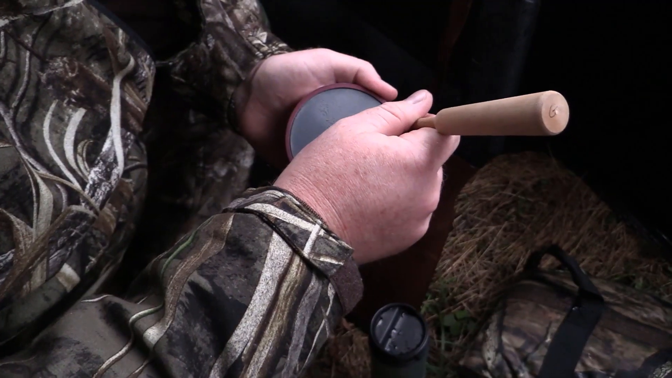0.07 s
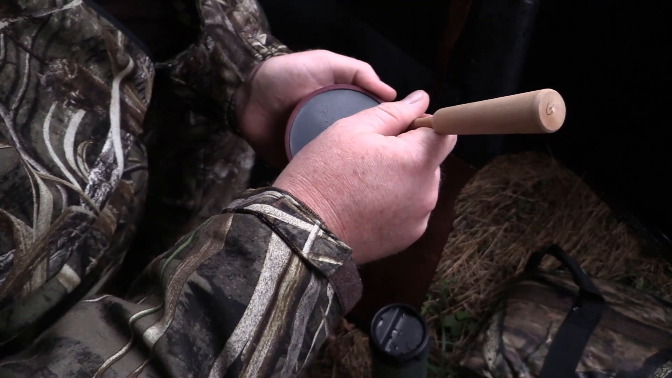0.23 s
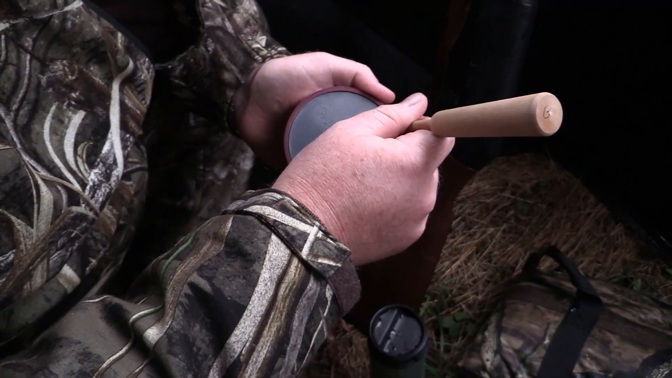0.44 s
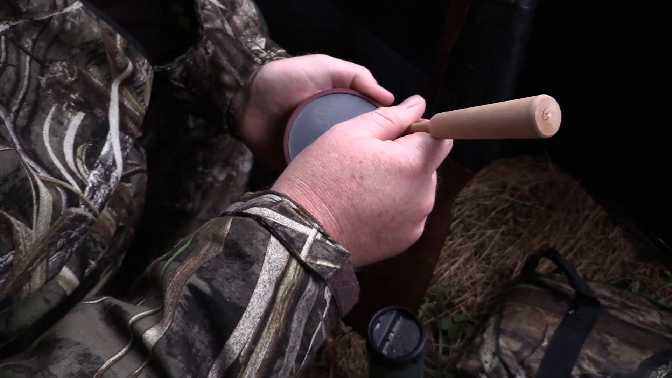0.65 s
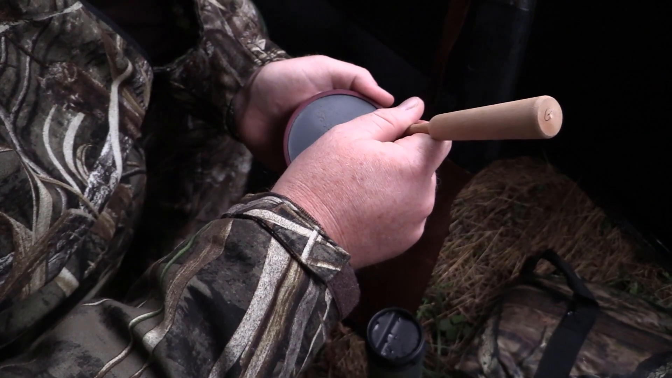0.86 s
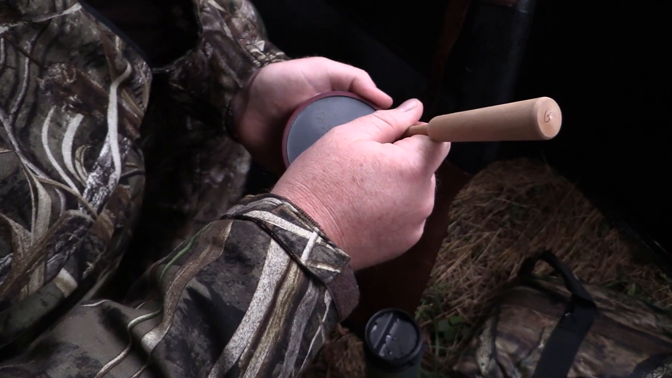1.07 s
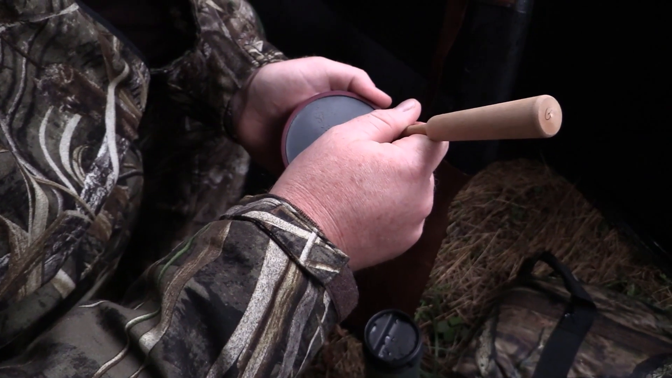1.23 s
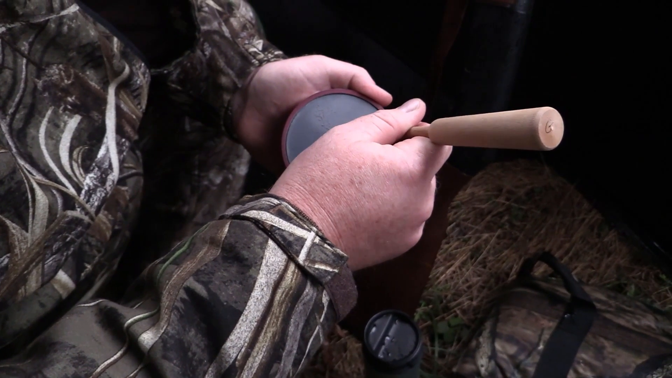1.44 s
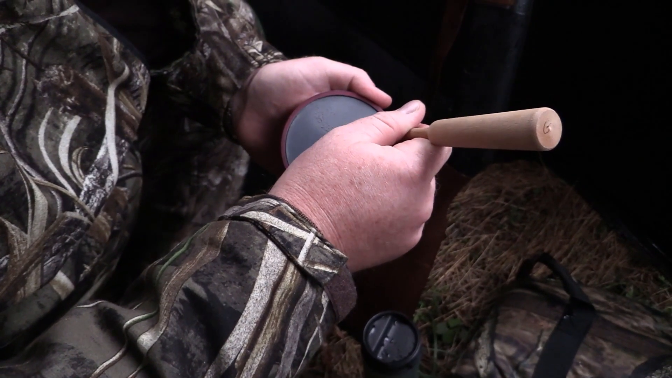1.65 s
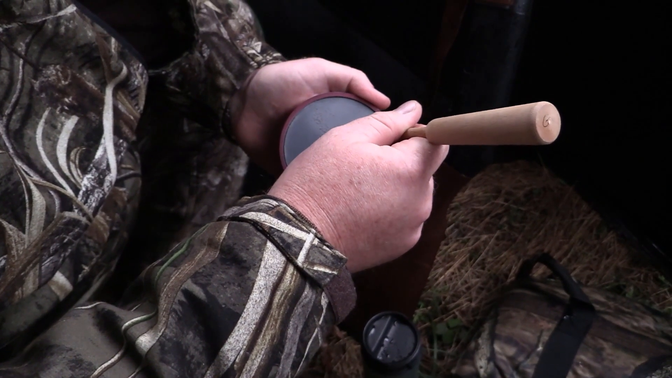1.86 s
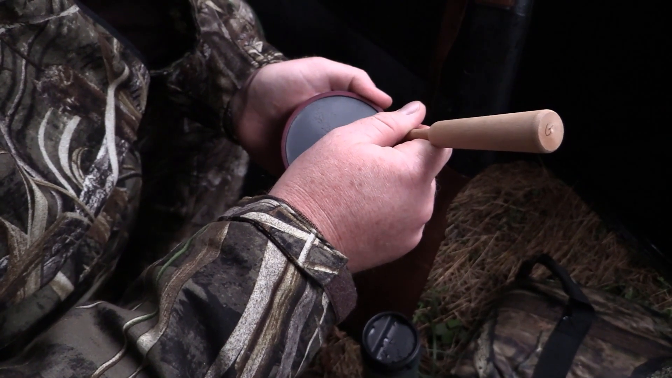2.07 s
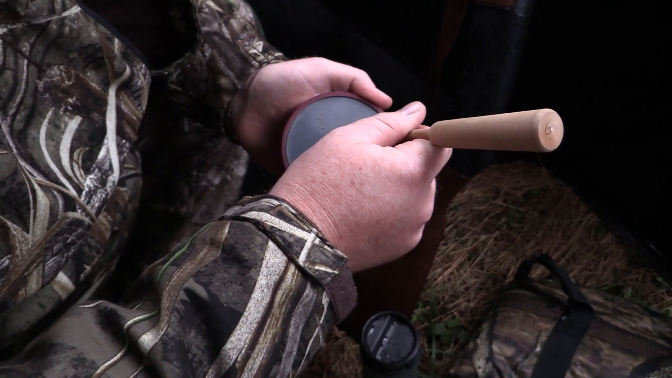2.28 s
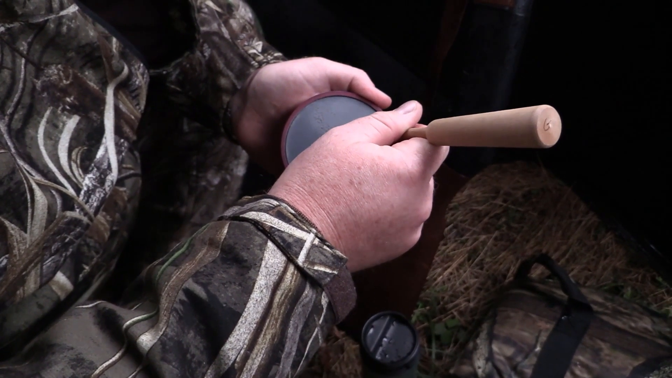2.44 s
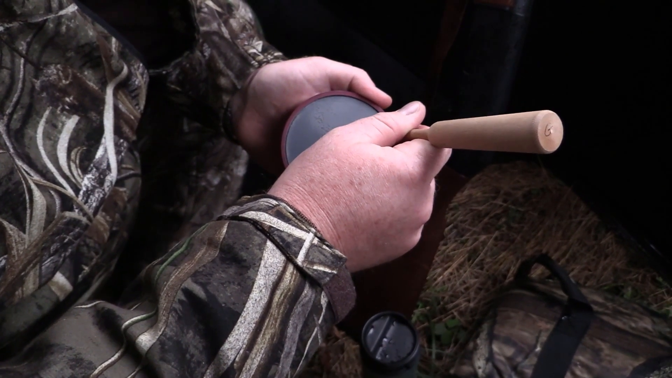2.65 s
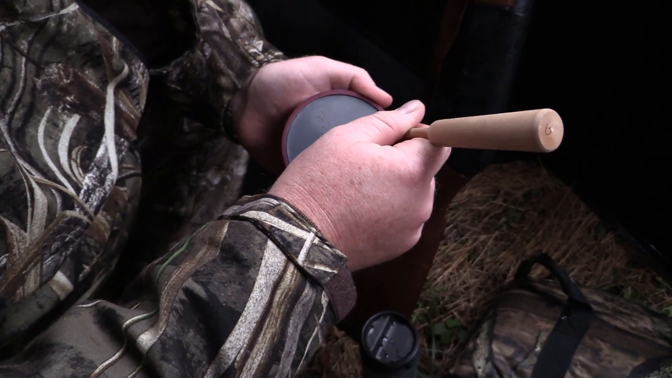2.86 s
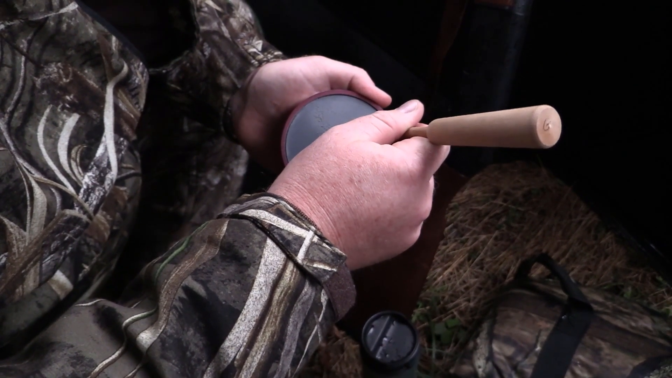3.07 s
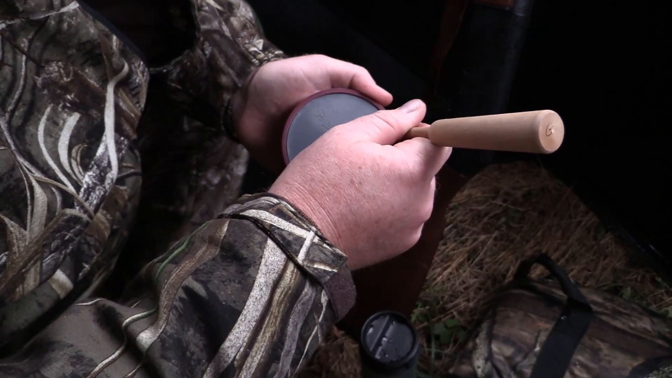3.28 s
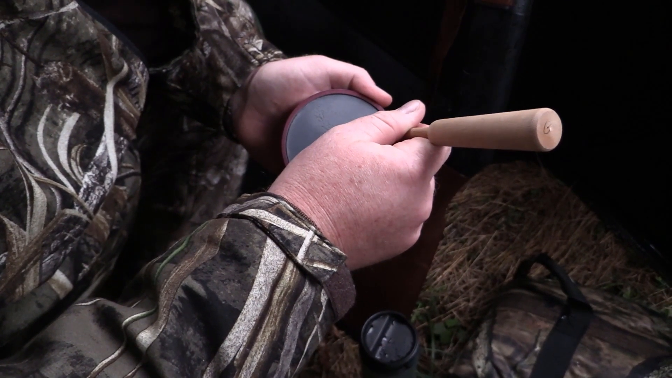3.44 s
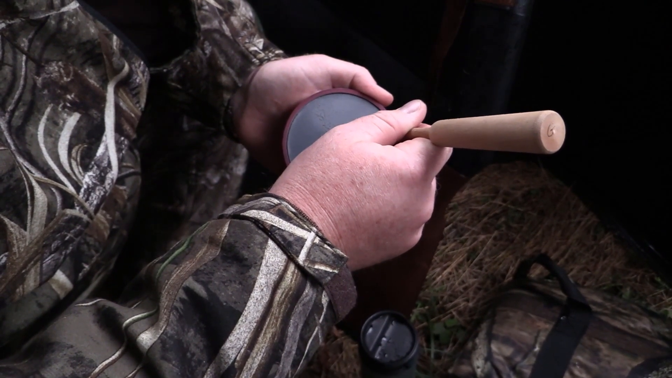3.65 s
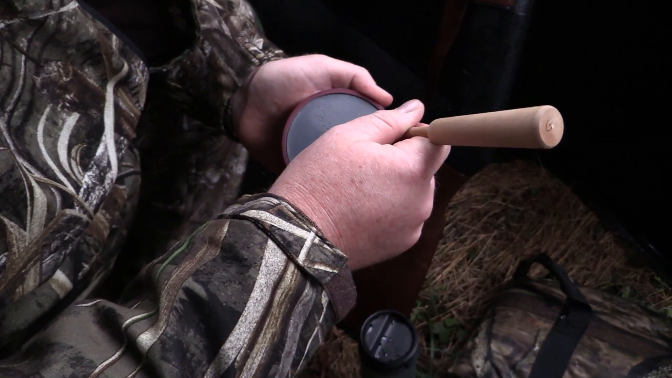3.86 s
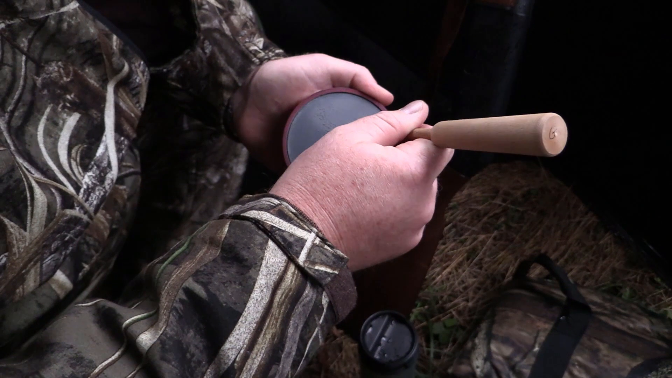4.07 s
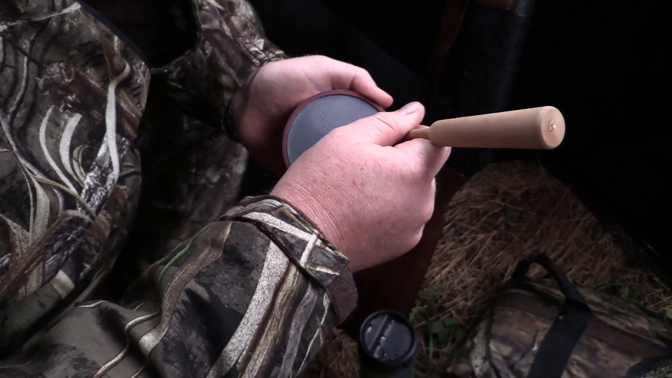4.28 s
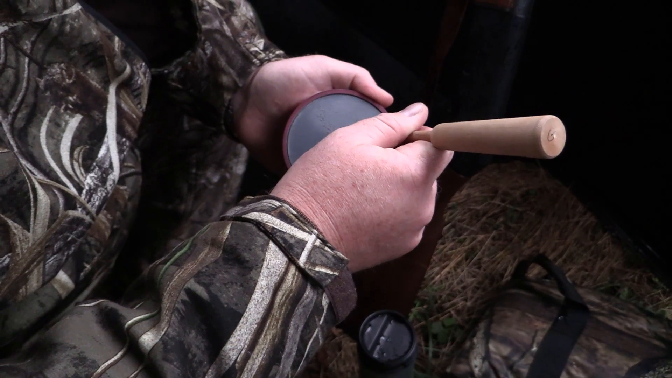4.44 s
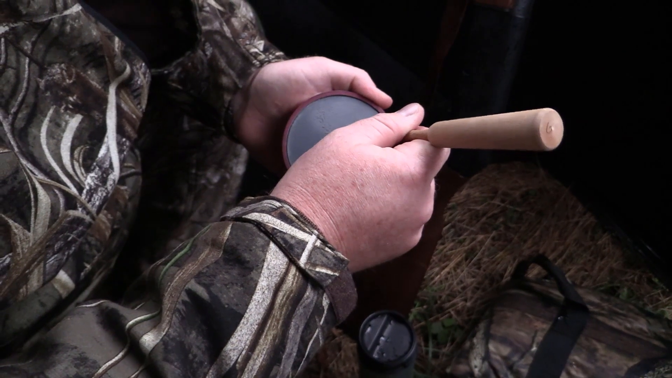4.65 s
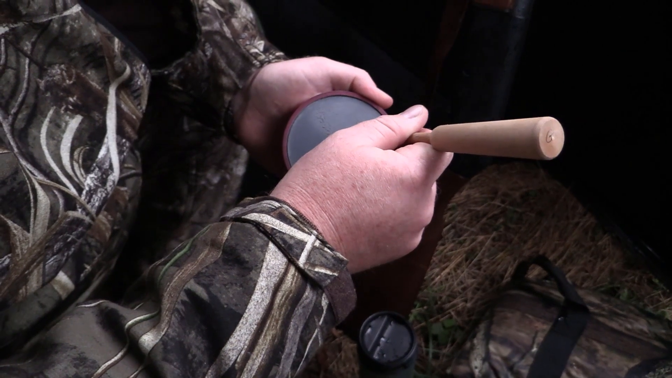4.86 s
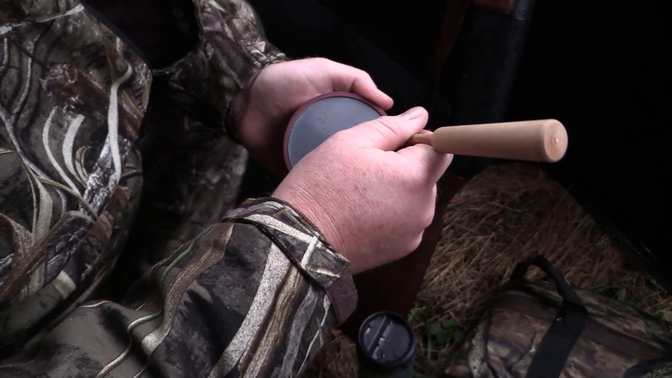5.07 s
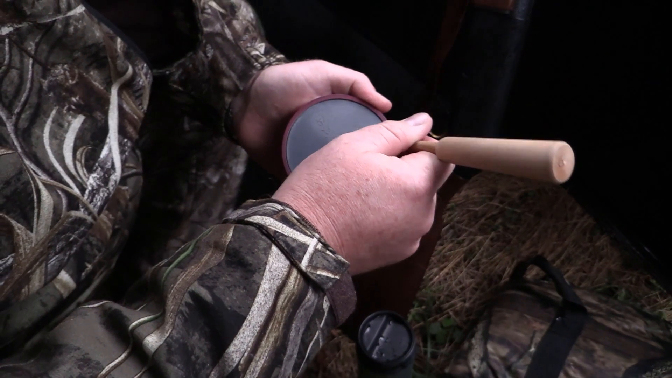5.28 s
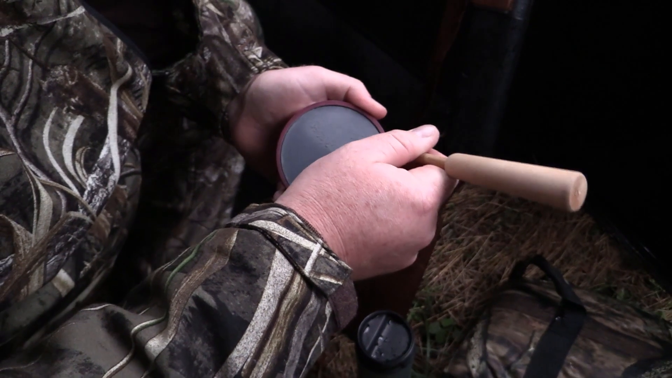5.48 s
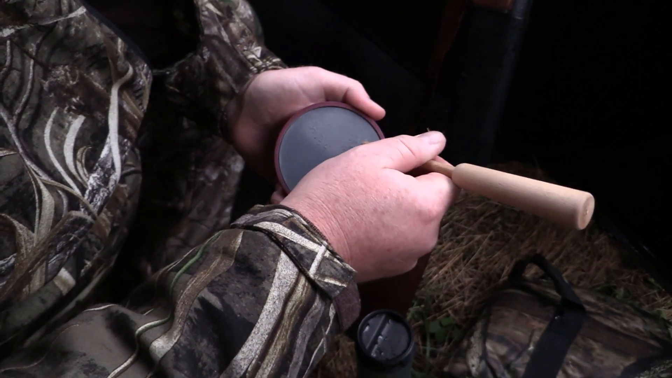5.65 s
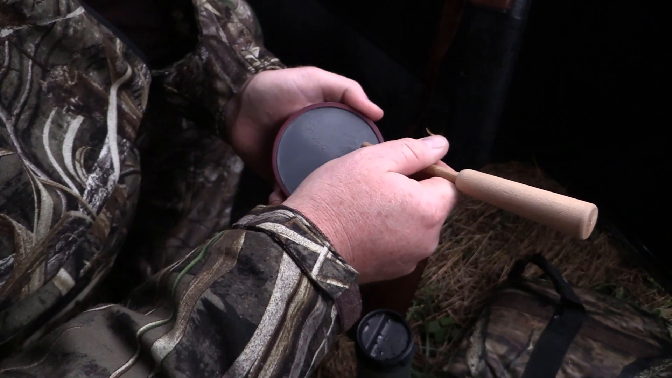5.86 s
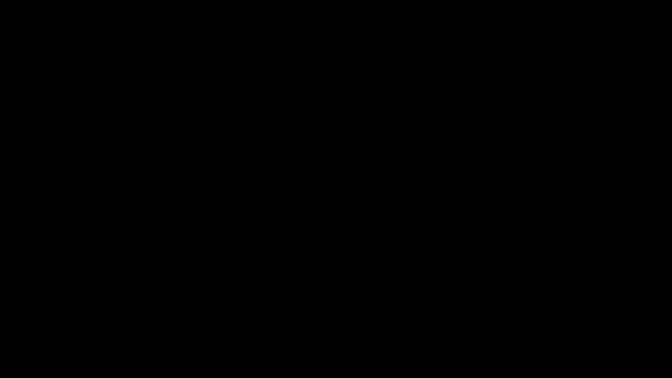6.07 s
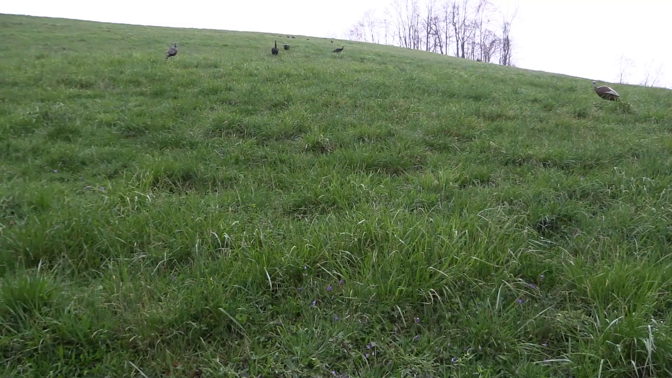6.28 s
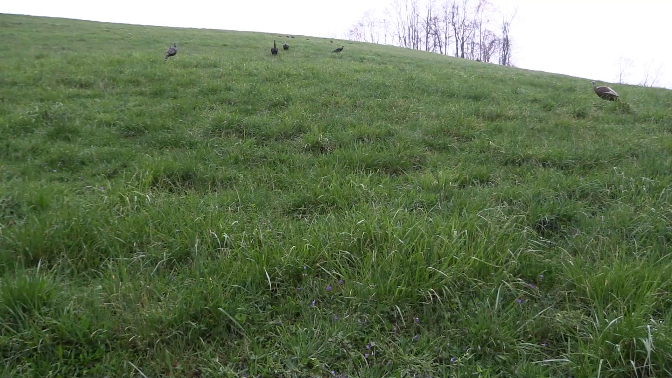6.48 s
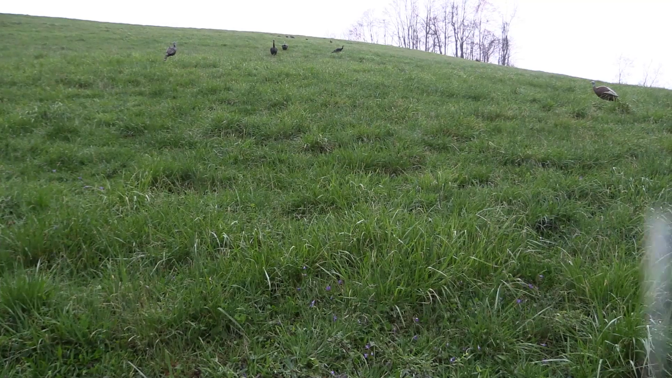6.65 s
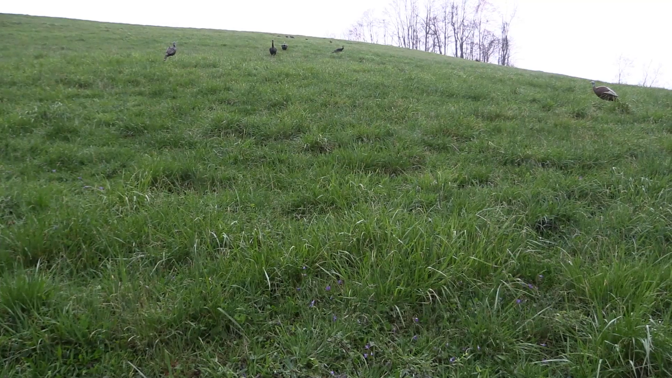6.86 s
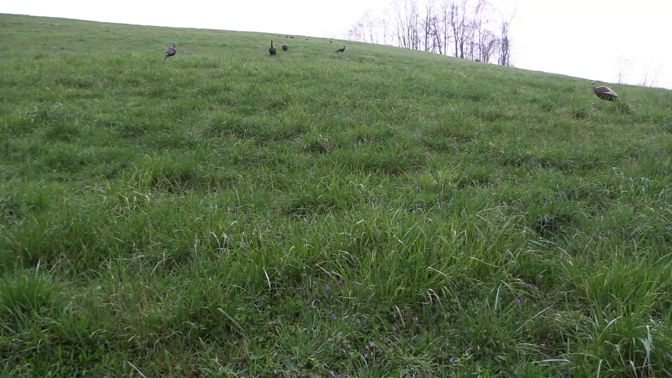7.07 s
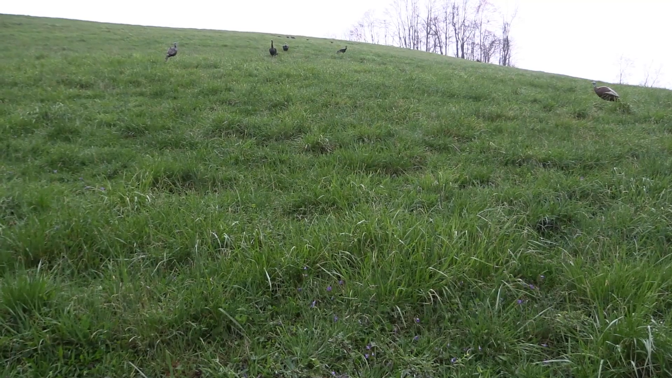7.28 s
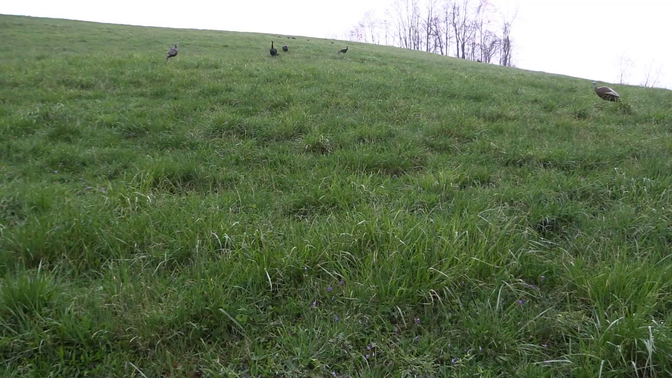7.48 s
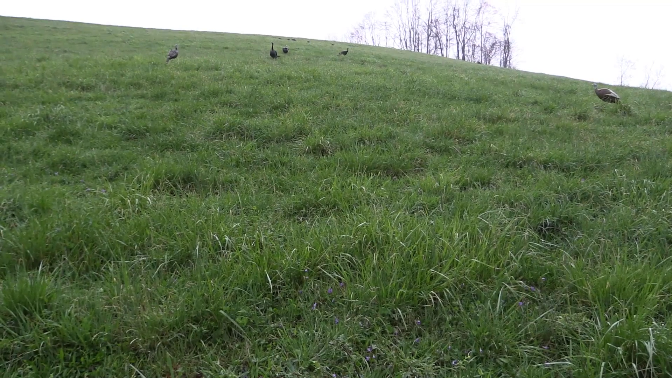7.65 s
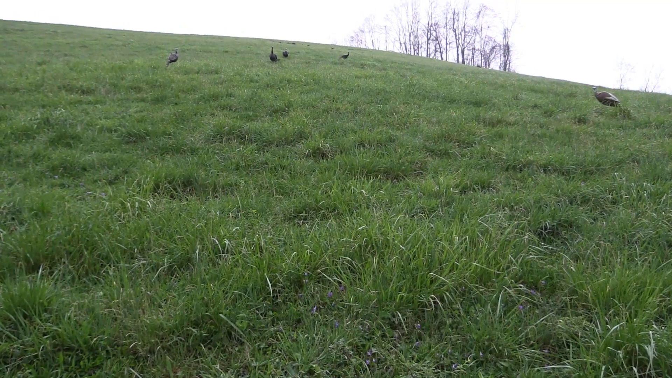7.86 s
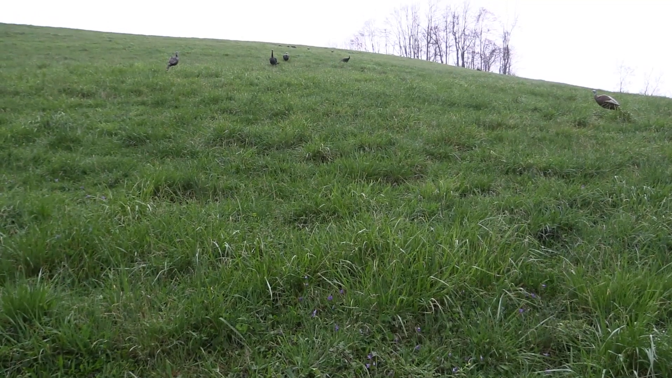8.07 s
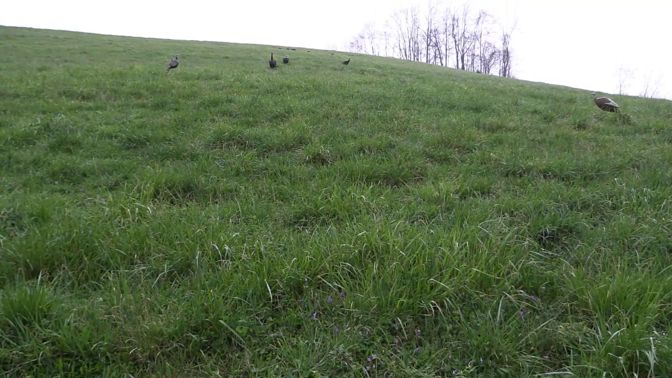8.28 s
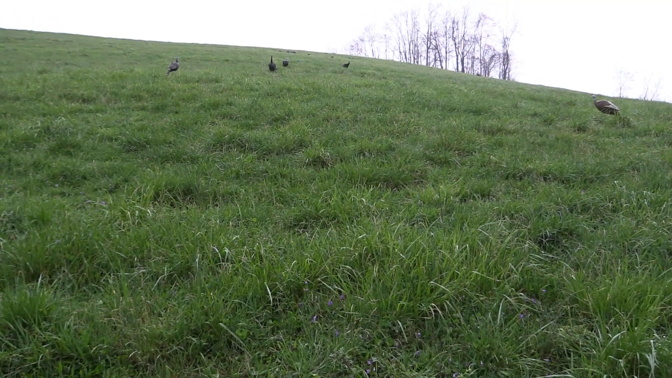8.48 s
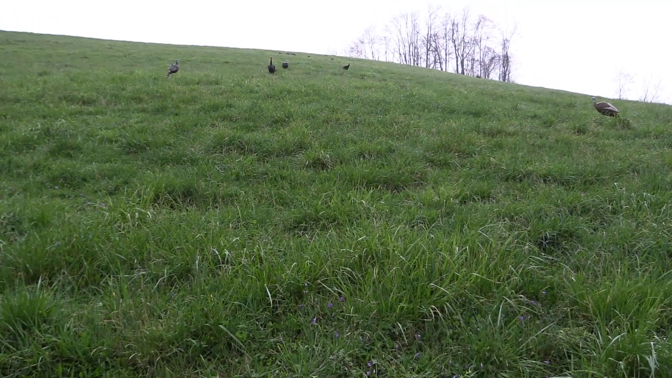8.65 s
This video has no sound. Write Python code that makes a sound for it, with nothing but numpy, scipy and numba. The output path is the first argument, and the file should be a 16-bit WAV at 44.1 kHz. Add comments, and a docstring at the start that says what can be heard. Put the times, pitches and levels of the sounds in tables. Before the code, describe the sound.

Steady rain patters densely on a fabric roof over a soft wash, heard from inside a small dry blind. Very close, a striker on a pot call makes five sharp, hollow clucks at about 0.2, 0.5, 0.8, 1.1 and 1.8 seconds, each a tiny squeaky chirp dipping and rising. From 2.3 to 5.0 come eight yelps, roughly 0.4 seconds apart, each under a tenth of a second, nasal and woody; the first are loud and clear, later ones weaker and raspier. The loud calls duck the rain slightly; faint knocks and dull splashes fall between. Rain alone follows, with small splashes near 5.4 to 5.8. A low handling bump at 6.0 leads into a momentary dropout at 6.1. Then rain sounds more open and darker, with many irregular close drops slapping and thumping cloth, the heaviest near 7.95, continuing to the end at about 8.7 with a faint low rumble swelling.

```python
"""Inside a fabric blind in the rain, the microphone hears a wooden striker drawn over a pot call.
Five short clucks, then eight yelps, come from a tip that sticks and slips and rings the pot.
Rain on the roof is a dense train of filtered impacts over a wash, with a few dull splashes.
After a brief dropout the rain is heard from the open side; single drops slap and thump the cloth close by.
The recorder's limiter holds the calls down and ducks the rain under them."""
import sys
import numpy as np
from scipy import signal
from scipy.fft import rfft, irfft, next_fast_len
from scipy.io import wavfile
from scipy.ndimage import uniform_filter1d, minimum_filter1d, map_coordinates
from numba import njit

SR = 44100
rng = np.random.default_rng(int(sys.argv[2]) if len(sys.argv) > 2 else 0)


def put_to_file(sound):
    """Save the sound as 16-bit audio at rate SR, in the file named by the first command-line argument."""
    columns = np.atleast_2d(sound).T  # one column per channel
    safe = np.clip(columns, -1, 1)
    whole_steps = np.round(safe * 32767)
    wavfile.write(sys.argv[1], SR, whole_steps.astype(np.int16))


N = 384552
TIME = np.arange(N) / SR

# Ringing modes of the pot and striker. Each row: frequency in Hz, 60 dB decay in s, relative level in dB.
POT_MODES = [(1084, 0.062, 3), (1240, .025, -14.5), (1507, 0.088, 2), (1940, 0.052, -0.5),
             (3100, .025, -26.5)]
# How the pot radiates the slips' harmonics. Each row: frequency in Hz, relative level in dB.
POT_COLOUR = [(620, -22.5), (1070, 2.5), (1250, -1.5), (1400, 4), (1510, 10.5), (1680, 1.5), (1850, -5.5),
              (2030, 0.5), (2250, -17.5), (2480, -9), (2750, -21.5), (3100, -9), (3350, -20.5), (4100, -22),
              (4700, -33), (6300, -39), (6740, -35.5), (7400, -45), (15000, -67)]
# Short rings of the pot: first the ringing tail of an earlier cluck, then light knocks of the striker.
# Each row: start in seconds, level in dB.
POT_RINGS = [(0, -18.5), (1.118, -19), (3.0205, -18.5), (3.397, -24), (4.156, -24), (4.868, -18)]
# Clucks, short hard flicks of the striker. Each row: start in seconds, length in s, attack in s,
# base of the slip rate in Hz, level in dB, overtones in dB, rasp from 0 to 1.
CLUCKS = [(0.156, 0.041, 0.0092, 659, 4.5, 3.5, 0), (0.459, 0.034, .012, 708, 1, -0.5, 0.4),
          (0.753, 0.043, 0.0078, 655, 4.5, 3, 0.3), (1.121, 0.048, 0.007, 669, 3, 3, 0.13),
          (1.798, 0.049, .007, 646, 3.5, 2.5, 0.16)]
# Yelps, longer pulls. Each row: start in seconds, length in s, attack in s, base of the slip rate in Hz,
# final rate in Hz, share of the stroke before the turn, drop in a skid in Hz (none if negative),
# level in dB, overtones in dB, rasp from 0 to 1.
YELPS = [(2.301, 0.078, 0.0057, 610.5, 745, 0.55, -7, 2.5, 2.5, 0.32),
         (2.704, 0.077, .003, 612, 748, 0.37, -6, 5, 0.5, 0.23),
         (3.062, 0.088, 0.0092, 624, 705, 0.71, 6.5, -3.5, -1, 0.32),
         (3.451, 0.082, 0.0076, 606, 675, 0.68, 2.5, -3.5, -2.5, .45),
         (3.82, .072, 0.0056, 624, 638, 0.42, 36.5, -11.5, -9.5, 0.63),
         (4.184, 0.089, 0.024, 636, 717, 0.33, -2, 1, -5, 0.27),
         (4.551, 0.089, 0.015, 624, 624, 0.57, 51.5, -4.5, -3.5, 0.41),
         (4.899, 0.097, 0.0068, 617, 660, .59, 84.5, -4, -2.5, 0.45)]
# Heavy drops on the cloth close by. Each row: start in seconds, slap in dB, nominal slap pitch in Hz,
# tick in dB, thump in dB; the levels are rms over 10 ms.
NEAR_DROPS = [(6.197, -25, 970, -37, -18), (6.228, -24, 530, -60, -16.5), (6.2382, -31, 3600, -38, -30),
              (6.29, -17, 3250, -44, -21), (6.3366, -15, 1270, -39, -19), (6.3756, -13, 714, -35, -20),
              (6.405, -22.5, 2510, -50, -35), (6.4747, -17.5, 1150, -42, -13.5),
              (6.5135, -24, 1700, -51, -19.5), (6.563, -17.5, 990, -32, -14.5),
              (6.6463, -17.5, 1620, -36.5, -23), (6.7961, -19.5, 1370, -54, -47),
              (6.859, -22, 606, -62, -14.5), (6.8978, -13.5, 1017, -26, -30), (7.057, -26, 2680, -55, -40),
              (7.073, -17, 900, -56, -12), (7.0976, -23.5, 2050, -48, -35), (7.1125, -28, 1060, -39, -20.5),
              (7.195, -16, 1170, -35, -35), (7.2313, -17, 1240, -26, -13.5), (7.304, -21, 900, -34, -22),
              (7.349, -21, 1130, -38, -21), (7.3777, -16, 1300, -32, -13.5), (7.5268, -17, 760, -38, -30),
              (7.5496, -16.5, 920, -41, -17.5), (7.6128, -15.5, 1270, -35, -20.5),
              (7.7109, -24.5, 1150, -36, -19), (7.745, -22, 960, -39, -19),
              (7.8345, -19.5, 820, -35, -16.5), (7.8899, -22, 1900, -43, -22),
              (7.9451, -10, 1100, -16.5, -4), (8.187, -18.5, 550, -26.5, -14.5),
              (8.3231, -22, 2010, -34.5, -22), (8.414, -18, 1270, -42, -12), (8.5727, -18.5, 470, -40, -16),
              (8.539, -21, 1580, -33.5, -16.5), (8.6578, -23.5, 970, -35, -42)]
# Gathered water splashing on the roof. Each row: start in seconds, length of the spatter in s,
# first drop in dB, spatter in dB.
SPLASHES = [(0.243, .015, -28, -27), (0.339, 0.014, -21, -25), (1.0294, 0.011, -17.5, -33),
            (3.187, 0.033, -24.5, -24.5), (3.307, 0.022, -19.5, -20.5), (3.4392, .015, -20.5, -22),
            (4.665, 0.027, -21.5, -23.5), (5.3985, .015, -36, -24), (5.47, 0.013, -29, -20.5),
            (5.813, 0.018, -23, -21.5)]
# Colour of the rain under the roof. Each row: frequency in Hz, relative density in dB per Hz.
ROOF_COLOUR = [(15, -46), (25, 5), (39, -21), (130, 1.5), (190, -5), (354, 1), (394, -2), (863, -5),
               (1520, -8), (2050, -10), (2910, -11.5), (3920, -16), (4870, -24.5), (12500, -45.5),
               (16000, -53)]
# Colour of the rain from the open side. Each row: frequency in Hz, relative density in dB per Hz.
OPEN_COLOUR = [(15, -15), (25, -4), (130, -1), (439, -7), (516, -10.5), (575, -9.5), (734, -11.5),
               (1400, -12.5), (1650, -18.5), (2110, -18), (3080, -21), (3920, -23), (4740, -32),
               (5280, -34.5), (16000, -57)]
# Strength of the rain under the roof, before a trim. Each row: time in seconds, level in dB.
ROOF_FLOW = [(0.0, -27), (0.3, -27), (2.62, -27.5), (3.13, -27.5), (4.53, -27), (4.61, -29.5), (5.92, -27),
             (6.04, -27)]
# Strength of the rain from the open side, before a trim. Each row: time in seconds, level in dB.
OPEN_FLOW = [(6.16, -30), (6.33, -30), (6.91, -33), (7.44, -29.5), (8.72, -28.5)]
# Low rumbles: a hand moves just before the dropout, and a faint rumble on the open side swells near the end.
# Each row: peak in seconds, half width in s, level in dB.
RUMBLES = [(5.98, 0.026, -23.5), (8.68, 0.27, -30)]
# The brief dropout: its start and its end in seconds.
DROPOUT = (6.084, 6.122)

CLUCK_CATCH_HZ, CLUCK_END_HZ = 810.5, 772  # slip rate at first and last
CLUCK_TURN, CLUCK_LATE_DB = 0.315, -3.5  # share of the stroke before it climbs; level it eases to
YELP_CATCH_HZ, YELP_LATE_DB = 691, -5  # slip rate as the tip bites; level a 0 dB yelp eases to
SKID_S, REGRIP_S = 0.032, 0.0048  # how long a skid lasts; how fast the tip grips again
RELEASE_S = 0.0053  # the tip leaves the slate
THUMP_HZ, THUMP_SCATTER = 179, 0.34  # middle swing of the cloth; its spread from place to place in octaves
RUMBLE_DB = -34.5  # on the open side
TOP_HZ = 15800  # treble cut-off of the recorder


def pot_call(body_db=-17, cluck_lift_db=-12, yelp_lift_db=-23):
    """The pot rings on from a cluck, at light knocks, under each stroke and as the striker stops."""
    out = np.zeros(N)
    t = np.arange(SR // 8) / SR
    modes = sum(undb(db) * ring(t, hz, t60) for hz, t60, db in POT_MODES)
    body = soften(modes, 4900)
    for at, db in POT_RINGS:
        add(out, at, undb(db) * body)
    for rows, call, lift_db in (CLUCKS, cluck, cluck_lift_db), (YELPS, yelp, yelp_lift_db):
        for at, length, *gesture in rows:
            add(out, at, call(length, *gesture))
            add(out, at + length, undb(lift_db) * body)
    body_response = body / np.abs(rfft(body)).max()
    return out + undb(body_db) * signal.fftconvolve(out, body_response)[:N]


def cluck(length, attack, low_hz, db, overtones_db, rasp,
          settle=0.797, top=0.97, bite_db=-4, bite_overtones_db=-5):
    """The pitch starts high, drops as the pressure builds, and climbs as the tip lets go."""
    t = np.arange(int((length + RELEASE_S) * SR)) / SR
    bite = np.exp(-(t / (settle * attack)) ** 3)
    climb = ramp(t / length, CLUCK_TURN, top)
    hz = low_hz + (CLUCK_CATCH_HZ - low_hz) * bite + (CLUCK_END_HZ - low_hz) * climb
    return stroke(t, length, attack, hz, db + bite_db * bite, CLUCK_LATE_DB,
                  overtones_db + bite_overtones_db * bite, rasp, third_db=1, ease=0.46, end_db=-1.5)


def yelp(length, attack, low_hz, end_hz, turn, skid_hz, db, overtones_db, rasp,
         settle_s=0.0089, sag_s=0.018, carry=0.37, skid_rasp=0.083, bite_overtones_db=-6):
    """The pitch scoops down and up; in some a rough skid drags it lower until the tip grips at the turn."""
    t = np.arange(int((length + RELEASE_S) * SR)) / SR
    bite = np.exp(-t / settle_s)
    past_turn = t - turn * length
    sag = ramp(past_turn + SKID_S, 0, sag_s)
    regrip = ramp(past_turn, 0, REGRIP_S)
    skid = (skid_hz > 0) * sag * (1 - regrip)
    climb = ramp(t / length, turn, 0.98)
    hz = low_hz + (YELP_CATCH_HZ - low_hz) * bite - skid_hz * skid + (end_hz - low_hz) * climb
    return stroke(t, length, attack, hz, db, YELP_LATE_DB + carry * db,
                  overtones_db + bite_overtones_db * bite, rasp + skid_rasp * skid,
                  third_db=1.0, ease=0.5, end_db=-14)


def stroke(t, length, attack, hz, db, late_db, overtones_db, rasp, third_db, ease, end_db,
           ease_span=0.22, third_share=0.83, slack_db=-15, jitter=0.039, shimmer_db=4,
           judder_db=2, scrape_db=-31, rasp_db=-14, grit_db=1):
    """The tip sticks and slips hz times a second; the hand presses, then eases off."""
    u = np.minimum(t / length, 1)
    slip_hz = hz * (1 + jitter * rasp * walk(500, size=len(t)))
    phase = 2 * np.pi * np.cumsum(slip_hz) / SR
    slack = ramp(u, 0.39, 1) ** 2.3  # a loose tip slips smoothly, with weak overtones
    edge_db = overtones_db + slack_db * slack
    gate = 1 + np.cos(phase)  # the slate scrapes once in every slip
    grit = unit(band(rng.standard_normal(len(t)), 5100, 16000) * gate)
    slips = undb(grit_db + edge_db) * grit
    for k in range(1, 23):
        share = np.interp(k, [2, 3, 4], [0, third_share, 1])  # the first two harmonics keep their level
        harmonic_db = third_db * (k == 3) + share * edge_db
        shimmer = shimmer_db * (0.5 + share) * rasp * walk(300, size=len(t))
        slips = slips + undb(harmonic_db + shimmer) * np.sin(k * phase)
    scrape = unit(band(rng.standard_normal(len(t)), 1200, 2260) * gate)
    # harmonics flare as they cross a resonance of the pot
    tone = unit(colour(slips, POT_COLOUR)) + (undb(scrape_db) + undb(rasp_db) * rasp) * scrape
    pressure_db = db + (late_db - db) * ramp(u, ease, ease + ease_span) + end_db * ramp(u, 0.85, 1)
    pressure_db = pressure_db + judder_db * rasp * walk(130, size=len(t))
    contact = np.minimum(t / attack, 1) * (1 - ramp(t, length, length + RELEASE_S))
    return tone * undb(pressure_db) * np.sin(np.pi / 2 * contact) ** 2


def near_drops():
    """Loud single drops close by strike tighter or slacker spots, which set the pitch of each thump."""
    out = np.zeros(N)
    for (at, *blow), spot in zip(NEAR_DROPS, rng.standard_normal(len(NEAR_DROPS))):
        thump_hz = THUMP_HZ * 2 ** (THUMP_SCATTER * spot)
        add(out, at, drop(*blow, thump_hz))
    return out


def drop(slap_db, slap_hz, tick_db, thump_db, thump_hz, slap_cycles=1.67, thump_cycles=7.1,
         tick_s=0.00059, spray_s=0.0012, spray_db=-19, cloth_hz=4100, rebound=1.0):
    """Water ticks on impact and slaps the cloth, which gives way and swings back in a low thump."""
    t = np.arange(SR // 16) / SR
    noise = rng.standard_normal((2, len(t)))

    slap_t60 = slap_cycles / slap_hz
    slap = ring(t, 1.04 * slap_hz, slap_t60) + 0.5 * ring(t, 1.54 * slap_hz, 0.63 * slap_t60)
    # the ripple comes back from a seam a cycle or so later and gives each drop its own colour
    delay = int(rng.uniform(0.6, 1.49) * SR / slap_hz)
    slap = slap + rebound * np.roll(slap, delay)
    spray = undb(spray_db) * unit(band(noise[0], 1000, 3800)) * np.exp(-t / spray_s)
    # the soft cloth takes the treble off the slap and spray
    slap = soften(band(slap + spray, 230, 12000, order=1), cloth_hz, order=6)

    tick = band(noise[1] * np.exp(-t / tick_s), 3800, 6100, order=1)
    tick = soften(tick, 9500, order=2)

    thump_t60 = thump_cycles / thump_hz
    thump = -ring(t, thump_hz, thump_t60) - 0.16 * ring(t, 0.64 * thump_hz, thump_t60)
    thump = thump - 0.36 * ring(t, 1.88 * thump_hz, 0.84 * thump_t60)
    thump = band(thump, 45, 720)
    return sized(slap, slap_db) + sized(tick, tick_db) + sized(thump, thump_db)


def small_drops(start, end, db, spread_db, tick_db, thump_db, count):
    """Lighter drops fall at random moments and places on the cloth."""
    out = np.zeros(N)
    for when, size, place, slack, sharp in rng.random((count, 5)):
        level = db + spread_db * size ** 2
        slap_hz, thump_hz = 800 * 2.93 ** place, 110 * 3.0 ** slack
        blow = drop(level, slap_hz, level + tick_db + 12 * sharp, level + thump_db, thump_hz)
        add(out, start + when * (end - start), blow)
    return out


def splashes(slap_hz=900, tick_db=-56, thump_db=1.5, thump_hz=330):
    """A dull drop lands on the roof with a handful of droplets around it."""
    out, swell = np.zeros(N), np.zeros(N)
    for at, length, drop_db, spatter_db in SPLASHES:
        add(out, at, drop(drop_db, slap_hz, tick_db, spatter_db + thump_db, thump_hz))
        add(swell, at, undb(spatter_db) * signal.windows.tukey(int(length * SR), 0.5))
    droplets = band(patter(2500, 1.6), 350, 2500, order=1)
    return out + swell * unit(band(droplets, 150, 3270))


def rain(spectrum, flow, db, rate, spread_db, wash_db, flutter_db):
    """Countless impacts flutter in strength over a steady distant wash."""
    impacts = patter(rate, spread_db) * undb(flutter_db * np.minimum(walk(70), 1))
    wash = undb(wash_db) * rng.standard_normal(N)
    sound = colour(impacts + wash, spectrum)
    strength = undb(np.interp(TIME, *np.transpose(flow)) + db)
    return sound / np.std(band(sound, 260, 6000)) * strength


def patter(rate, spread_db):
    """A dense train of impacts, rate a second on average, of uneven but capped size."""
    hit = rng.random(N) < rate / SR
    sign = rng.choice([-1, 1], N)
    size = undb(spread_db * np.minimum(rng.exponential(size=N), 3.5))
    return unit(hit * sign * size)


def rumble():
    """Low noise bumps as a hand moves before the dropout, then stays faint and swells near the end."""
    swell = undb(RUMBLE_DB) * (TIME > DROPOUT[1])
    for at, width, db in RUMBLES:
        swell = swell + undb(db) * np.exp(-((TIME - at) / width) ** 2)
    return unit(band(rng.standard_normal(N), 53, 160)) * swell * undb(1.2 * walk(12))


def undb(db):
    """Decibels to gain."""
    return 10 ** (np.asarray(db) / 20)


def unit(x):
    """Scale to rms 1."""
    return x / np.sqrt(np.mean(x ** 2))


def sized(x, db):
    """Scale a short sound so that its energy, spread over 10 ms, has this rms level."""
    return x * undb(db) * np.sqrt(SR / 100 / np.sum(x ** 2))


def add(out, at, x):
    """Mix x in, starting at a time in seconds."""
    i = max(int(at * SR), 0)
    out[i:i + len(x)] += x[:max(N - i, 0)]


def band(x, lo_hz, hi_hz, order=2):
    """Causal band-pass."""
    edges = [lo_hz, min(hi_hz, SR / 2 - 1)]
    return signal.sosfilt(signal.butter(order, edges, "band", fs=SR, output="sos"), x)


def soften(x, hz, order=4):
    """Causal low-pass."""
    return signal.sosfilt(signal.butter(order, min(hz, SR / 3), fs=SR, output="sos"), x)


def colour(x, points):
    """Shape by a (Hz, dB) spectrum, causally, so that clicks keep their attack and resonances ring."""
    n = 2 * next_fast_len(len(x) // 2 + 2048)
    hz, db = np.transpose(points)
    log_hz = np.log(np.fft.rfftfreq(n, 1 / SR) + 1)
    log_gain = np.log(undb(np.interp(log_hz, np.log(hz), db)))
    # folding the cepstrum forward in time gives the minimum-phase filter
    cepstrum = irfft(log_gain, n)
    cepstrum[1:n // 2] *= 2
    cepstrum[n // 2 + 1:] = 0
    return irfft(rfft(x, n) * np.exp(rfft(cepstrum)), n)[:len(x)]


def walk(rate, size=N):
    """Random values, rate a second, joined by straight lines, with a spread near 1."""
    steps = np.arange(size) * rate / SR
    knots = rng.standard_normal(size // 20 + 4)
    return map_coordinates(knots, [steps], order=1) * np.sqrt(3 / 2)


def ring(t, hz, t60):
    """A struck mode, 60 dB down after t60 seconds."""
    return np.sin(2 * np.pi * hz * t) * np.exp(-np.log(1000) * t / t60)


def ramp(x, start, end):
    """0 before start, 1 after end, straight between."""
    return np.clip((x - start) / max(end - start, 1e-6), 0, 1)


def scene(fade_s=0.018):
    """The call and the rain on the roof, a brief dropout, then the rain from the open side."""
    cut, resume = DROPOUT
    roof = rain(ROOF_COLOUR, ROOF_FLOW, db=1.0, rate=900, spread_db=3.5, wash_db=6.0, flutter_db=7.5)
    roof = roof + small_drops(0, cut, db=-37, spread_db=5, tick_db=-50, thump_db=-2, count=110)
    field = rain(OPEN_COLOUR, OPEN_FLOW, db=1.0, rate=1000, spread_db=3.5, wash_db=-0.5, flutter_db=5.5)
    field = field + small_drops(resume, N / SR, db=-38.5, spread_db=17, tick_db=-31, thump_db=-1, count=60)
    background = np.where(TIME < cut, roof, field)
    mix = background + pot_call() + near_drops() + splashes() + rumble()
    silenced = ramp(TIME, cut - fade_s / 2, cut + fade_s / 2) * (TIME < resume)
    return (mix * undb(-32 * silenced))[None]


@njit
def follow(x, attack, release):
    """Peak follower; attack and release are shares of the gap closed per sample."""
    out, e = np.empty(len(x)), 0.
    for i in range(len(x)):
        e += (x[i] - e) * (attack if x[i] > e else release)
        out[i] = e
    return out


def record(dry, ceiling_db=-0.19, release_s=0.057):
    """A rumble filter, a limiter that looks about a millisecond ahead, and the treble cut-off."""
    sound = signal.sosfilt(signal.butter(2, 27, "high", fs=SR, output="sos"), dry[0])
    peak = follow(np.abs(sound), 0.28, 1 - np.exp(-1 / (release_s * SR)))
    gain = 1 / np.maximum(peak / undb(ceiling_db), 1)
    gain = uniform_filter1d(minimum_filter1d(gain, size=64), size=64)
    return signal.sosfilt(signal.ellip(8, 0.2, 70, TOP_HZ, fs=SR, output="sos"), sound * gain)[None]


dry = scene()
out = record(dry)
put_to_file(out)
```